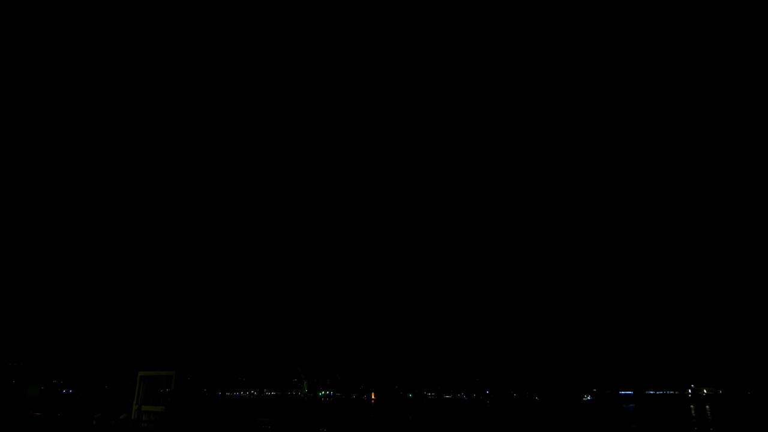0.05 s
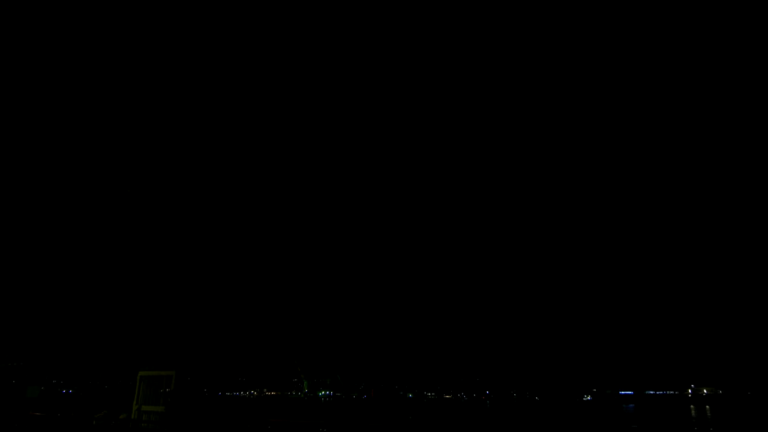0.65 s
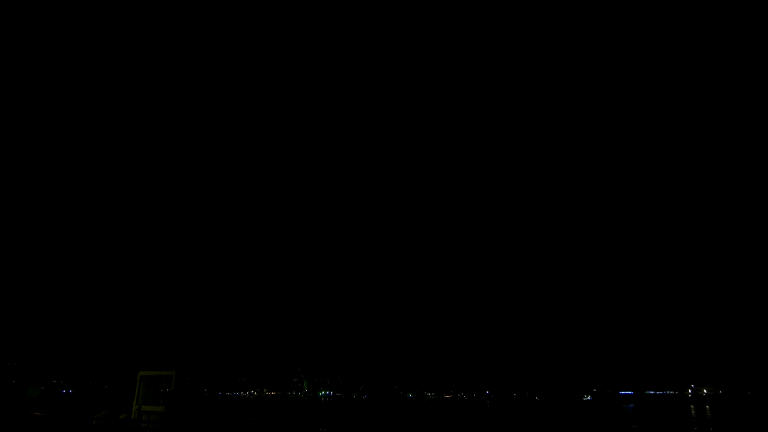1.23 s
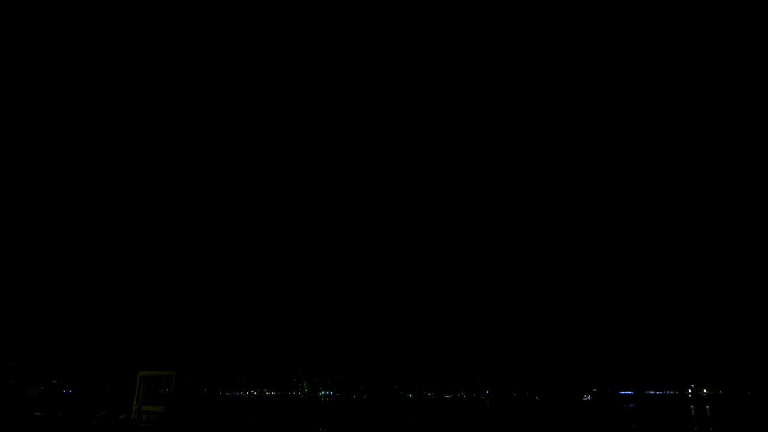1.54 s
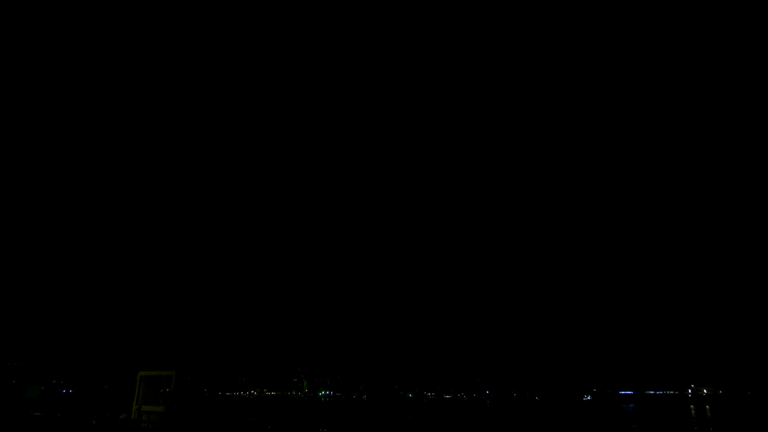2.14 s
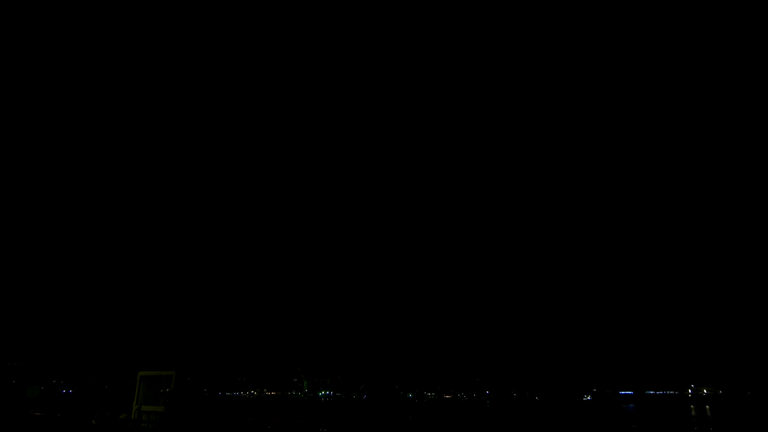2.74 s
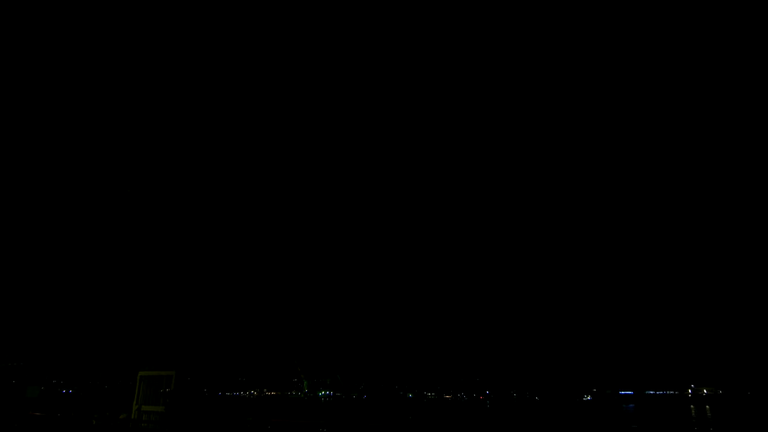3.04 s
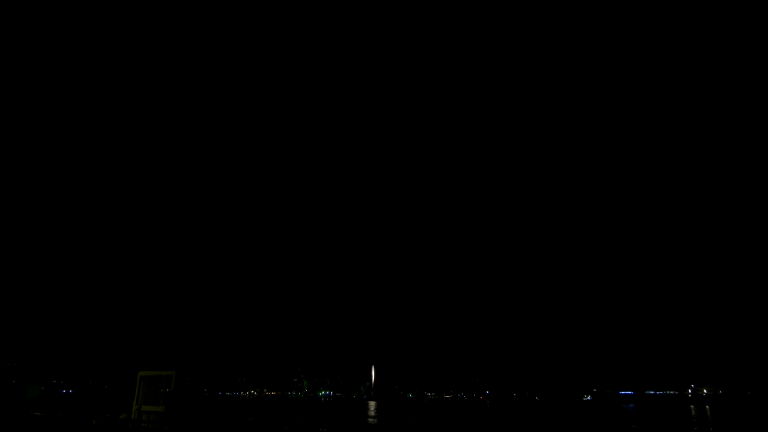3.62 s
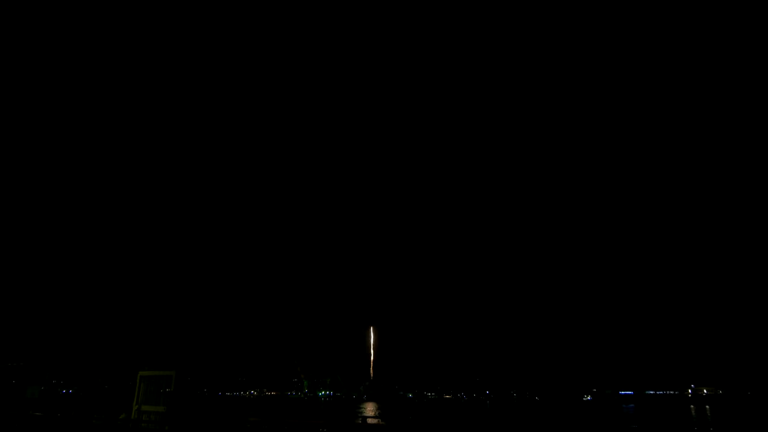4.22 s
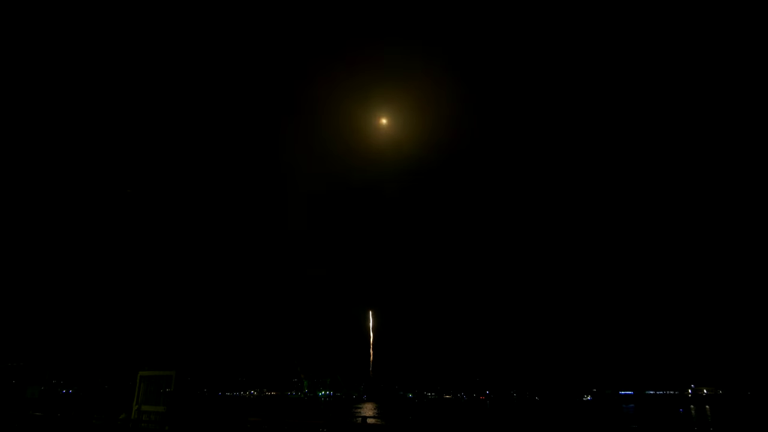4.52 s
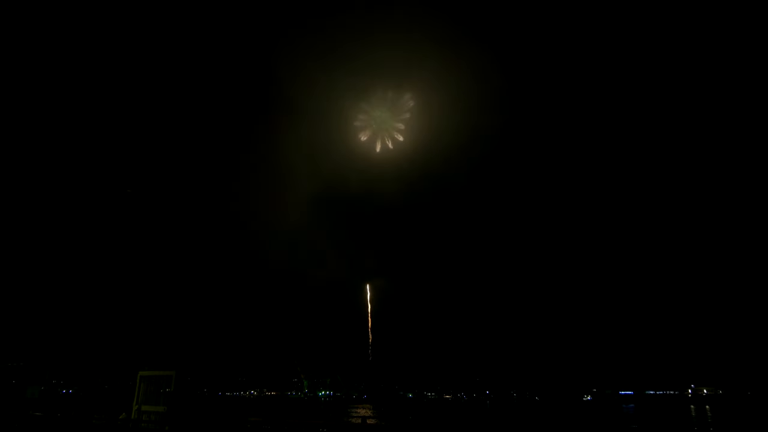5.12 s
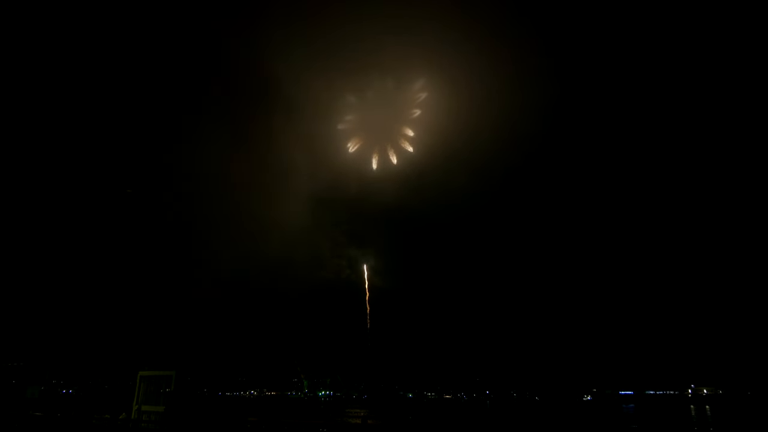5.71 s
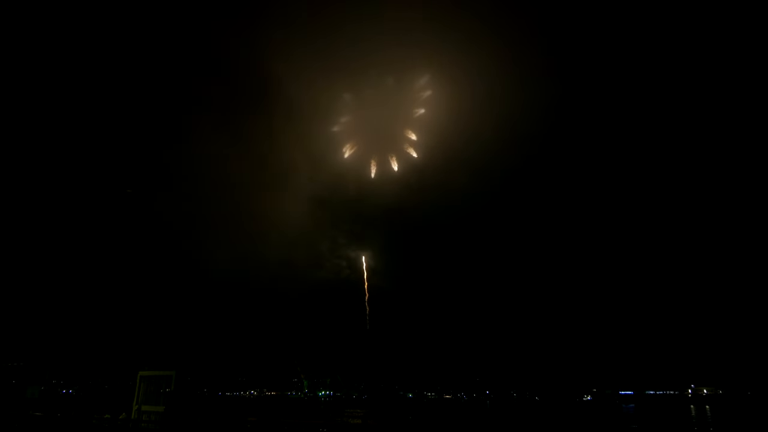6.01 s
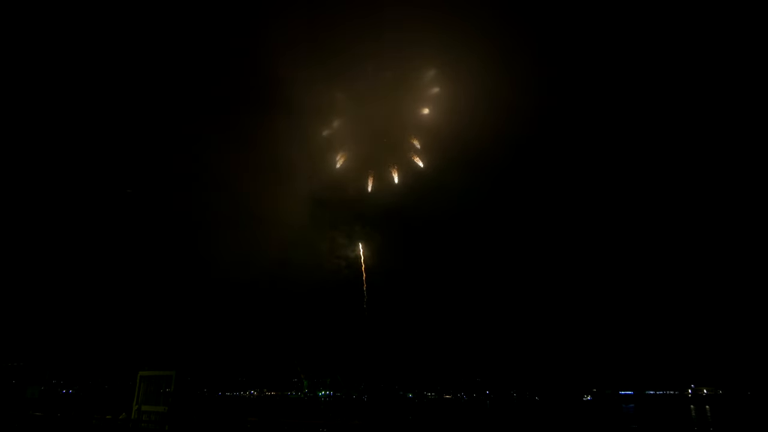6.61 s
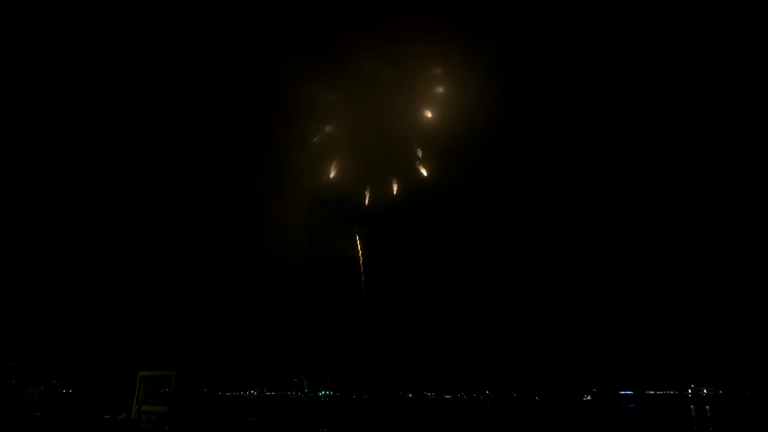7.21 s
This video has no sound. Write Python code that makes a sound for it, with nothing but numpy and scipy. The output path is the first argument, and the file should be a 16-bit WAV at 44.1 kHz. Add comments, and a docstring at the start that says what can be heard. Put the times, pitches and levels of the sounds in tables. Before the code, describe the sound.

Outdoors at night beside open water, a diesel engine hums low and steadily throughout, over the dark wash of a distant town. A few very faint, brief rustles sound close by in the first second, and now and then until about 6 seconds. At about 1.5 seconds a distant firework mortar fires from straight ahead with a loud thud and deep boom. It rolls along the shore, with quick slaps off nearby buildings and a later cluster of echoes around 2.7 seconds. A second launch, duller and a little softer, comes at about 4.7 seconds and echoes back near 5.9 seconds. At about 6.1 seconds the shell bursts overhead, the sharpest and loudest bang, a bright crack with a deep boom and a brief hissing reflection. Its rumble fades along the shore, with weaker echoes around 7.2 seconds, while the hum carries on.

```python
"""Distant fireworks over water

Night, far across open water: two mortar launches, then one shell burst, each a shock with a deep boom.
Every bang rolls away along the shore and slaps back off buildings, some over a second later.
Underneath, a diesel engine hums steadily over the town's low wash; something rustles faintly close by."""
import sys
import numpy as np
from scipy import signal
from scipy.fft import rfft, irfft
from scipy.io import wavfile
from scipy.ndimage import uniform_filter1d

SR = 44100
rng = np.random.default_rng(int(sys.argv[2]) if len(sys.argv) > 2 else 0)


def to_wav(sig):
    """Store sig (one row per channel, or 1-D mono) as 16-bit WAV at the path in sys.argv[1].

    Samples outside -1..1 are clipped; the rate is SR.
    """
    pcm = np.clip(np.atleast_2d(sig), -1, 1) * 32767
    pcm = np.round(pcm).astype(np.int16)
    wavfile.write(sys.argv[1], SR, pcm.T)  # frames by channels


N = 324135

# stereo image of sound from all around: f/Hz, left-right likeness
STEREO_LIKENESS = [(60, 0.82), (130, 0.99), (290, 0.96), (640, 0.9), (1410, 0.5), (3100, -0.37),
                   (6820, -0.017), (15000, 0.08)]
# tone of the town's wash: f/Hz, level/dB
WASH_EQ = [(15, -20.5), (30, -3.5), (64, -6.5), (118, -3), (158, -8), (230, -3.5), (340, -8.5), (600, -15),
           (1000, -21), (1500, -25), (2300, -34.5), (4500, -39), (8000, -43), (15500, -43.5)]
# narrow bands that stand out of the background: f/Hz, width/Hz, boost/dB
STEADY_PEAKS = [(266, 11.3, 3.5), (433, 37, 4.5), (508, 19, 5), (689, 19, 8), (792, 21, 8.5),
                (1047, 40, 6.5), (1318, 22, 5.5)]
# stereo lean of wash and engine: f/Hz, left minus right/dB
TOWN_PAN = [(60, 1), (110, -4), (200, -1), (380, -2.0), (700, -2.0), (1290, -2), (2380, -1.5), (4400, 0),
            (8120, 0.5), (15000, 0.5)]
# harmonics of the engine's two-turn cycle, the sixth being the firing rate: multiple, level/dB
ENGINE_ORDERS = [(2, -57), (3, -48), (4, -56), (5, -60), (6, -31), (7, -46.5), (8, -47), (9, -65),
                 (12, -57)]
# soft rustles: t/s, level/dB, half-width/s
RUSTLE_HITS = [(0.179, -57.5, 0.015), (.566, -57.5, 0.00092), (0.738, -60.5, 0.015), (2.04, -65, .005),
               (2.248, -67, .012), (2.89, -68, .02), (3.216, -63, 0.0034), (3.262, -61.5, 0.0058),
               (3.438, -69, 0.028), (4.08, -69.5, 0.025), (5.774, -66.5, 0.0091), (5.927, -68, 0.034)]
# tone of a rustle: f/Hz, level/dB
RUSTLE_EQ = [(500, -26), (2000, -12), (3500, 2.5), (6000, -4), (9500, -2), (13000, -6.5), (16000, -19.5)]
# tone of sound scattered by the rough shore: f/Hz, level/dB
SCATTER_EQ = [(30, 0.5), (90, 5.5), (140, 2.5), (250, 5), (450, -0.5), (900, 1), (2000, -6.5), (4000, -5),
              (8000, -6), (15000, 0.5)]
# decay of the roll along the shore: f/Hz, t60/s
ROLL_DECAY = [(50, 11), (200, 6), (600, 3.7), (2000, 5.4), (5000, 3.5), (12000, 0.6)]
# railings and trees spray back only treble, more so for a bang overhead:
# delay/s, mortar level/dB, shell level/dB, low cut/Hz, decay/s
THICKET_ECHOES = [(.03, -25, -9, 2010, .025), (0.102, -8.5, -1, 6550, 0.013),
                  (.129, -25, -8.5, 1000, 0.016), (0.255, -18, -18, 4200, 0.071)]
# walls, reached by one path from the mortar on the ground and another from the shell overhead:
# mortar delay/s, mortar level/dB, shell delay/s, shell level/dB, thud-crack crossover/Hz, crack/dB,
# clutter/dB, clutter decay/s
WALL_ECHOES = [(0.017, -9.5, .022, -19, 447, -17.5, 4, 0.007),
               (0.032, -23.5, .029, -17.5, 2500, -9, 2, 0.0073),
               (0.1069, -9.5, .0975, -16, 620, -30, -1.5, 0.011),
               (0.139, -16.5, .162, -19.5, 260, -31, -4, 0.026),
               (.252, -14.5, .236, -18, 280, -21, -9.5, 0.019),
               (0.301, -19.5, .302, -19, 750, -23, -3.5, .015),
               (0.336, -34.5, .327, -23, 1390, -14, -8.5, 0.0071),
               (.430, -18, .460, -26.5, 815, -30, -8, 0.03),
               (1.0585, -21, .966, -33.5, 1500, -22, -1.5, 0.02),
               (1.129, -19, 1.080, -36, 494.4, -5.5, 1.5, 0.036),
               (1.219, -9.5, 1.155, -21.5, 433, -10, -1.5, 0.038),
               (1.297, -12.5, 1.238, -25.5, 2260, -5.5, -3, 0.059)]
# two mortar launches, then the shell burst: t/s, level/dB, swing/Hz, swing decay/s, boom/Hz, boom/dB,
# direct high cut/Hz, bounce delay/s, bounce/dB, splash/dB, roll/dB, reflection low cut/Hz,
# reflection high cut/Hz, near echoes/dB, far echoes/dB, glint of the echoed crack/dB
BANG_CUES = [(1.4508, -3.5, 109, 0.0097, 41, -10.5, 1500, 0.0039, -9, -11, -10.5, 260, 3900, 0.5, 0, -4.5),
             (4.6888, -6, 110.4, 0.007, 42.6, -9, 755, 0.00253, -15.5, -6, -13, 227, 3120, -6.5, -3, -12),
             (6.0854, -1.7, 150.5, 0.0048, 69.5, -10.5, 10800, .0053, -2, -10, -8, 50, 9200, -1.5, 0, -11)]

WALL_RISE, THICKET_RISE = 0.46, 0.28  # clutter's build-up time as a share of its decay time


def gain_of(db):
    """Decibels to gain."""
    return 10 ** (np.asarray(db) / 20)


def unit_rms(x):
    """Scales to rms 1."""
    return x / np.sqrt(np.mean(x ** 2) + 1e-20)


def curve_at(points, hz):
    """Reads a table on a log-frequency axis."""
    f, value = np.transpose(points)
    return np.interp(np.log(hz + 1), np.log(f + 1), value)


def add(mix, s, sound):
    """Lays a stereo sound into the mix at s seconds."""
    part = mix[:, max(round(s * SR), 0):][:, :sound.shape[1]]
    part += sound[:, :part.shape[1]]


def eq(x, curve):
    """Colours a sound by a table of f/Hz, level/dB."""
    size = x.shape[-1]
    return irfft(rfft(x) * gain_of(curve_at(curve, np.fft.rfftfreq(size, 1 / SR))), size)


def passed(x, hz, kind, order=2):
    """Causal low-pass or high-pass."""
    return signal.sosfilt(signal.butter(order, np.clip(hz, 5, .45 * SR), kind, fs=SR, output="sos"), x)


def drift(hz):
    """Random wander of rms 1, rolling off above hz."""
    rolloff = np.exp(-(np.fft.rfftfreq(N, 1 / SR) / hz) ** 2)
    return unit_rms(irfft(rfft(rng.standard_normal(N)) * rolloff, N))


def diffuse(size):
    """Noise from all around: nearly mono in the bass, wide in the treble."""
    left, unrelated = rfft(rng.standard_normal((2, size)))
    likeness = np.clip(curve_at(STEREO_LIKENESS, np.fft.rfftfreq(size, 1 / SR)), -1, 1)
    right = likeness * left + np.sqrt(1 - likeness ** 2) * unrelated
    return irfft(np.array([left, right]), size)


def frontal(x, lead_s=.000046):
    """A wave from almost dead ahead arrives on the left just before the right."""
    hz = np.fft.rfftfreq(len(x), 1 / SR)
    right = irfft(rfft(x) * np.exp(-2j * np.pi * hz * lead_s), len(x))
    return np.array([x, right])


def town_wash(level_db=-48, swell_db=0.98, swell_below_hz=1700, patchy_db=1.5):
    """The distant town: a dark noise bed with a few narrow bands standing out; its body swells and fades, its
    hiss is even."""
    hz, _, bands = signal.stft(eq(diffuse(N), WASH_EQ), SR, nperseg=4096)
    patches = uniform_filter1d(rng.standard_normal(bands.shape[1:]), size=6, axis=0)
    patches = unit_rms(uniform_filter1d(patches, size=4, axis=1))
    peaks_db = sum(db / (1 + (2 * (hz - centre) / width) ** 2) for centre, width, db in STEADY_PEAKS)
    colour_db = peaks_db[:, None] + patchy_db * patches / (1 + (hz[:, None] / 2000) ** 2)
    noise = unit_rms(signal.istft(bands * gain_of(colour_db), nperseg=4096)[1][:, :N])
    body = passed(noise, swell_below_hz, "low", order=1)
    hiss = noise - body
    return gain_of(level_db) * (hiss + body * gain_of(swell_db * drift(14)))


def engine(cycle_hz=14.98, waver_db=-1.22, wander=0.0001):
    """A governed six-cylinder diesel; unequal cylinders add weak orders around the firing rate."""
    cycles = np.cumsum(cycle_hz * (1 + wander * drift(1.0))) / SR
    hum = sum(gain_of(db) * np.sqrt(2) * np.cos(2 * np.pi * (order * cycles + rng.random()))
              for order, db in ENGINE_ORDERS)
    return hum * gain_of(waver_db * drift(11))


def rustles(grain_db=2.5):
    """Short, grainy brushes of bright noise close by."""
    t = np.arange(N) / SR
    envelope = sum(gain_of(db) / (1 + ((t - s) / width_s) ** 2) for s, db, width_s in RUSTLE_HITS)
    return envelope * unit_rms(eq(diffuse(N), RUSTLE_EQ) * gain_of(grain_db * drift(300)))


def through_air(pulse, delay_s, cut_at_1s_hz=4830, slope=.55):
    """The longer the path, the more top end the air takes."""
    return passed(pulse, cut_at_1s_hz / delay_s ** slope, "low", order=3)


def scattered(pulse, taps):
    """Smears a pulse over many small reflections, scaled to energy 1 on the left."""
    return signal.fftconvolve(pulse[None], taps / np.linalg.norm(taps[0]), axes=1)


def clutter(pulse, delay_s, decay_s, rise):
    """Many small surfaces at about one distance: their echo builds up to the delay, then tails off."""
    t = np.arange(2 * SR) / SR - delay_s
    envelope = np.exp(-np.maximum(t, -t / rise) / decay_s)
    return scattered(pulse, eq(diffuse(len(t)), SCATTER_EQ) * envelope)


def thickets(pulse, overhead):
    """Each thicket answers a blast with a short hiss."""
    out = np.zeros((2, 2 * SR))
    for delay_s, mortar_db, shell_db, low_cut_hz, decay_s in THICKET_ECHOES:
        spray = passed(through_air(pulse, delay_s), low_cut_hz, "high", order=1)
        gain = gain_of(shell_db if overhead else mortar_db)
        add(out, 0, gain * clutter(spray, delay_s, decay_s, THICKET_RISE))
    return out


def shore_roll(pulse, rise_s=0.0011, near_s=0.059, lumpy_db=2.5):
    """Reflections from ever farther ground: a lumpy tail that fades with distance, top end first."""
    t = np.arange(SR) / SR
    hz, frame_s, bands = signal.stft(eq(diffuse(SR), SCATTER_EQ), SR, nperseg=256)
    decay = gain_of(-60 * frame_s / curve_at(ROLL_DECAY, hz)[:, None])
    taps = signal.istft(bands * decay, SR, nperseg=256)[1][:, :SR]
    envelope = (1 - np.exp(-(t / rise_s) ** 2)) / np.sqrt(1 + (t / near_s) ** 2)
    return scattered(pulse, taps * envelope * gain_of(lumpy_db * drift(40)[:SR]))


def walls(pulse, near_db, far_db, glint_db, overhead, far_s=0.8, low_cut_hz_per_s=69):
    """Each wall slaps back amid the clutter of nearby buildings; the farther it is, the less bass."""
    out = np.zeros((2, 2 * SR))
    for mortar_s, mortar_db, shell_s, shell_db, split_hz, crack_db, clutter_db, decay_s in WALL_ECHOES:
        delay_s, db = (shell_s, shell_db) if overhead else (mortar_s, mortar_db)
        carry_db = np.interp(delay_s, [0, far_s], [near_db, far_db])
        echo = gain_of(db + carry_db) * through_air(pulse, delay_s)
        echo = passed(echo, low_cut_hz_per_s * delay_s, "high", order=1)
        thud = passed(echo, split_hz, "low", order=3)
        crack = gain_of(crack_db) * passed(echo, split_hz, "high", order=3)
        # restless air lets only a glint of the crack arrive in one piece
        add(out, delay_s, frontal(thud + gain_of(glint_db) * crack))
        add(out, 0, gain_of(clutter_db) * clutter(thud + crack, delay_s, decay_s, WALL_RISE))
    return out


def blast(swing_hz, decay_s, boom_hz, boom_db, boom_s=0.033):
    """A shock front: pressure jumps, swings under zero and settles, leaving a deep boom."""
    t = np.arange(8192) / SR
    shock = np.exp(-t / decay_s) * np.cos(2 * np.pi * swing_hz * t)
    boom = gain_of(boom_db) * np.exp(-t / boom_s) * np.sin(2 * np.pi * boom_hz * t)
    return shock - boom


def bang(s, db, swing_hz, decay_s, boom_hz, boom_db, direct_cut_hz, bounce_s, bounce_db, splash_db,
         roll_db, low_cut_hz, high_cut_hz, near_db, far_db, glint_db):
    """One bang: the direct hit, its bounce off the ground, its roll along the shore and its echoes."""
    out = np.zeros((2, N))
    overhead = s > 6  # the late cue is the shell
    shock = gain_of(db) * blast(swing_hz, decay_s, boom_hz, boom_db)
    # a path that grazes the surface rounds the attack more than paths through the open air
    direct = passed(shock, direct_cut_hz, "low", order=3)
    aloft = passed(passed(shock, high_cut_hz, "low"), low_cut_hz, "high", order=1)
    # soft, rough ground bounces the lows and sprays the highs
    bounce = passed(aloft, hz=760, kind="low", order=1)
    splash = clutter(passed(aloft, hz=2500, kind="high"), bounce_s, decay_s=0.0044, rise=THICKET_RISE)
    add(out, s, frontal(direct))
    add(out, s + bounce_s, gain_of(bounce_db) * frontal(bounce))
    add(out, s, gain_of(splash_db) * splash)
    add(out, s, gain_of(roll_db) * shore_roll(aloft))
    add(out, s, walls(aloft, near_db, far_db, glint_db, overhead))
    add(out, s, gain_of(near_db) * thickets(aloft, overhead))
    return out


def scene():
    """The mix: town bed and fireworks, both leaning slightly right, with the rustles up close."""
    left, right = town_wash() + engine()
    town = np.array([eq(left, [(hz, db / 2) for hz, db in TOWN_PAN]),
                     eq(right, [(hz, -db / 2) for hz, db in TOWN_PAN])])
    fireworks = sum(bang(*cue) for cue in BANG_CUES) * gain_of([[-.45], [.45]])
    return town + fireworks + rustles()


def record(dry, threshold_db=-3.0, sink_db_per_s=0.15, attack_s=0.0069, high_cut_hz=15800):
    """The gain sinks slowly throughout, ducks on the loudest peaks and stays down; then a steep high cut."""
    over_db = np.maximum(20 * np.log10(abs(dry).max(0) + 1e-9) - threshold_db, 0)
    sink_db = sink_db_per_s * np.arange(N) / SR
    held_db = np.maximum.accumulate(over_db - sink_db) + sink_db
    pole = np.exp(-1 / (attack_s * SR))
    ducked = dry / gain_of(signal.lfilter([1 - pole], [1, -pole], held_db))
    high_cut = signal.firwin(255, high_cut_hz, window=("kaiser", 8), fs=SR)
    return signal.oaconvolve(ducked, high_cut[None], "same")


dry = scene()
out = record(dry)
to_wav(out)
```